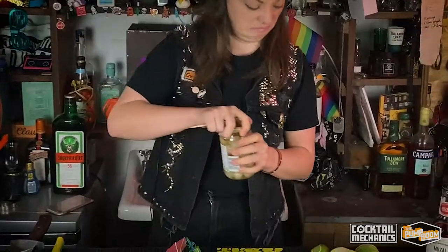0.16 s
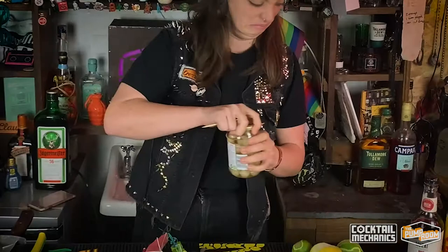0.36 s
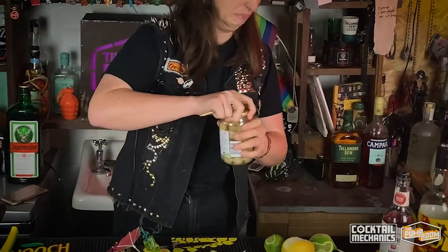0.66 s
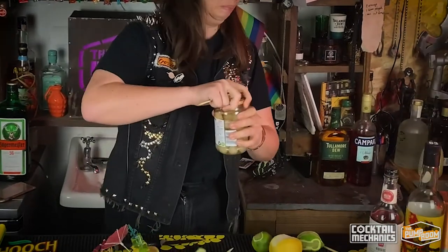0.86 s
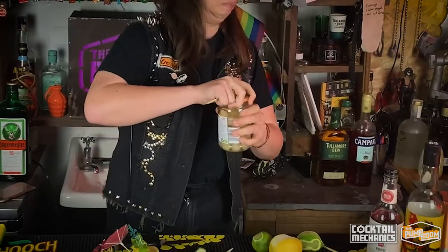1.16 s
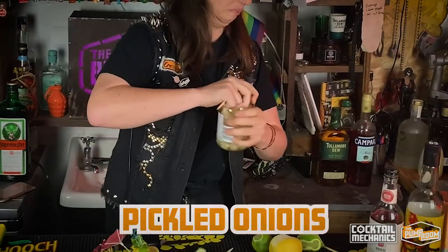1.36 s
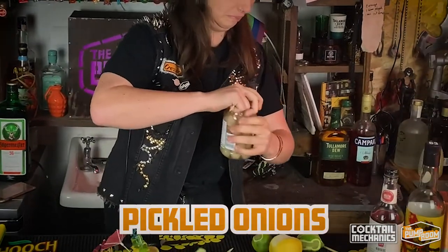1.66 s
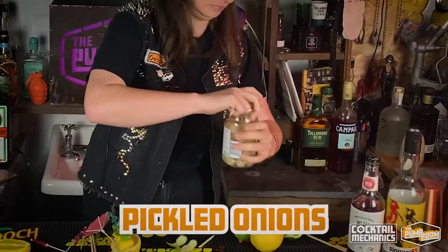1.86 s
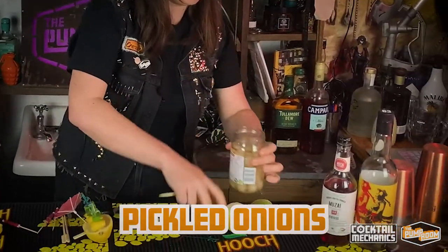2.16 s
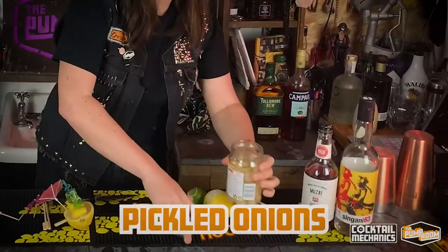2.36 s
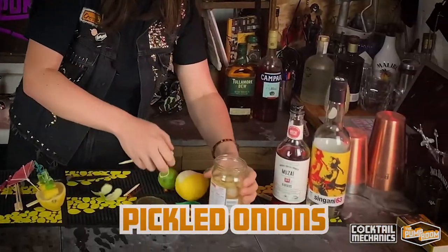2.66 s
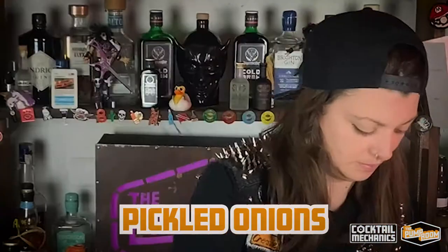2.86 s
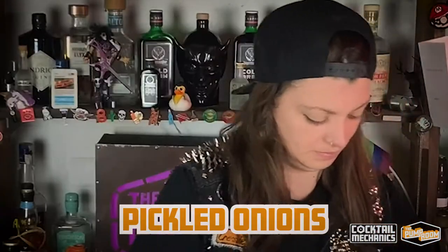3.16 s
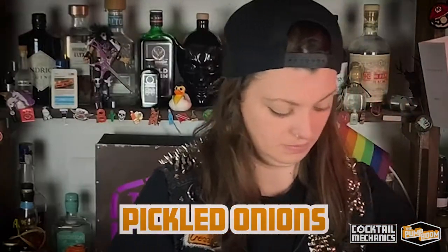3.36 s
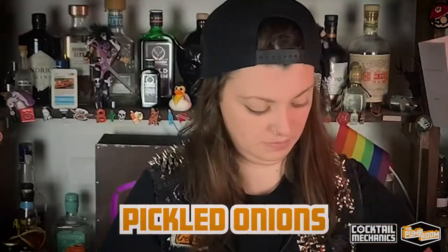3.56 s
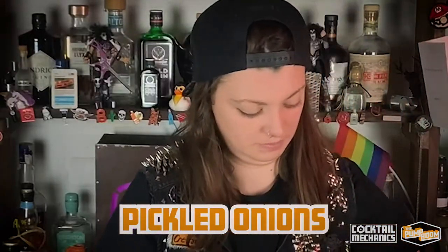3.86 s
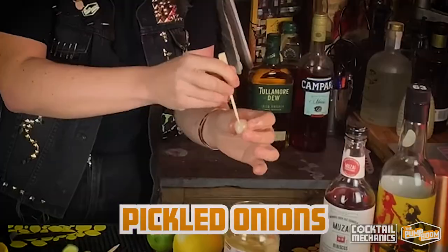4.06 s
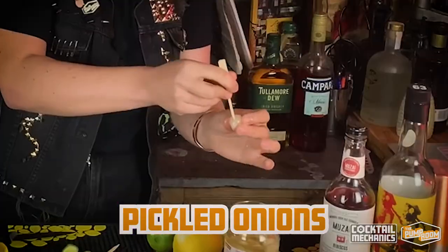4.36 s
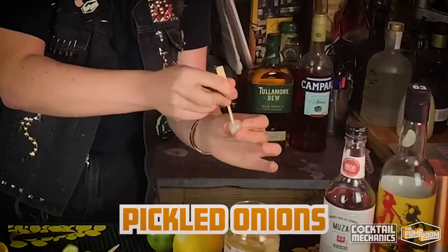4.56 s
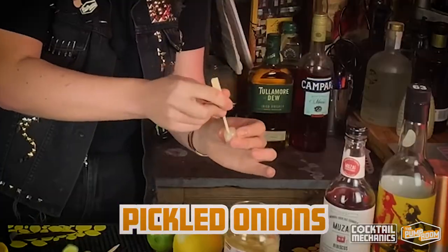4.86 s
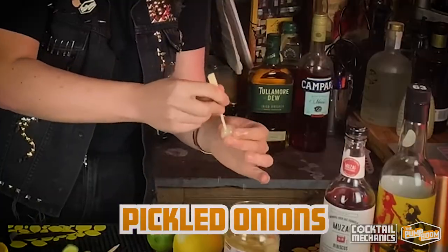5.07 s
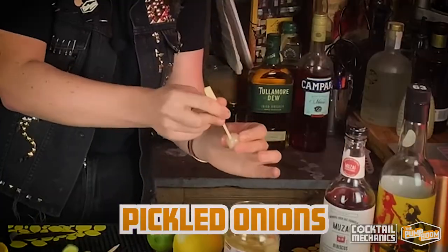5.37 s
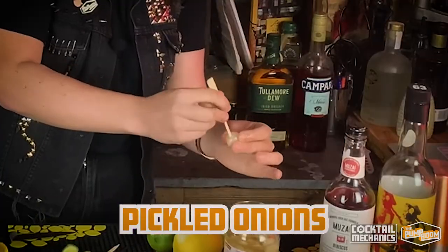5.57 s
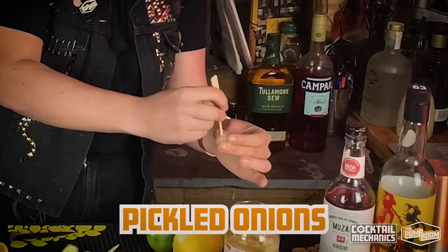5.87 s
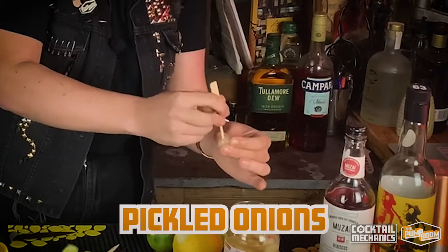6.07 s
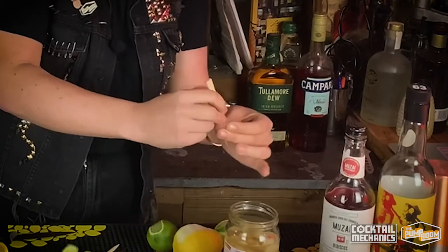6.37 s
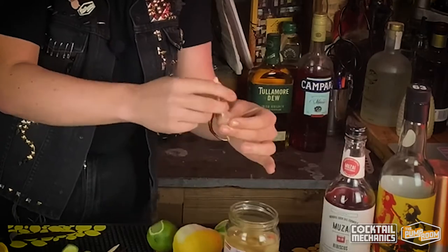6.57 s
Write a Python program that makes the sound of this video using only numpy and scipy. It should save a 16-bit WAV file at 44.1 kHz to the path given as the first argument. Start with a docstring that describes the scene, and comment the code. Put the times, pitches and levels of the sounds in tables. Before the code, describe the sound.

Quiet room rumble, a hollow jar-lid pop, a ringing metal clatter, a jar thudding onto a counter, then small crisp wet onion clicks.

```python
"""The lid of a jar of pickled onions pops its seal, ticks off the glass thread and drops with a ringing clink.
The pop is torn noise and notes of trapped air; the clink is a set of ringing modes fed by each blow.
The jar thuds and scuffs on the counter of a quiet bar, made from low modes and grainy noise.
A wet onion then clicks, squeaks and crunches onto a cocktail stick: short rings, stick-slip tones, grains.
Behind it lie rumbling air, a faint hum, a passing whine, soft pushes of air and light taps."""
import sys
import numpy as np
from scipy import signal
from scipy.fft import rfft, irfft, next_fast_len
from scipy.io import wavfile
from scipy.ndimage import uniform_filter1d

SR = 44100
rng = np.random.default_rng(int(sys.argv[2]) if len(sys.argv) > 2 else 0)


def wav_out(sig):
    """Save sig, one row per channel (or a flat mono array), as 16-bit PCM at SR to the path in sys.argv[1]."""
    wavfile.write(sys.argv[1], SR, np.round(np.clip(np.atleast_2d(sig).T, -1, 1) * 32767).astype(np.int16))


N = 295911
TIME = np.arange(N) / SR  # seconds

# centres of the lid's low, middle and high modes: (pitch_hz)
ZONES_HZ = [1000, 2500, 10040]


def amp(db):
    """Turns decibels into a plain multiplier."""
    return 10 ** (np.asarray(db) / 20)


def evened(x):
    """Scales a sound to an rms (average strength) of one."""
    return x / np.sqrt(np.mean(x ** 2) + 1e-20)


def read_spectrum(points, hz):
    """Reads (pitch_hz, level_db) points at any pitch, joining them on a log-frequency axis."""
    point_hz, point_db = np.transpose(points)
    return np.interp(np.log(hz + 1), np.log(point_hz + 1), point_db)


def add(mix, start_s, sound):
    """Mixes a sound in at its start time, cut off at the end of the scene."""
    part = mix[round(start_s * SR):][:len(sound)]
    part += sound[:len(part)]


def colour(x, spectrum):
    """Filters a sound by a (pitch_hz, level_db) spectrum."""
    hz = np.fft.rfftfreq(len(x), 1 / SR)
    return irfft(rfft(x) * amp(read_spectrum(spectrum, hz)), len(x))


def noise(spectrum, size=N):
    """Makes coloured noise with an rms of about one."""
    hiss = rng.standard_normal(next_fast_len(size))
    return evened(colour(hiss, spectrum))[:size]


def patches(depth_db, count):
    """Makes a random spectrum of bumps and dips: (pitch_hz, level_db)."""
    heights_db = depth_db * np.clip(rng.standard_normal(count), -2, 2)
    return np.transpose([np.linspace(0, SR / 2, count), heights_db])


def wander(size, smooth_samples):
    """Makes a smoothed random drift with an rms of one."""
    return evened(uniform_filter1d(rng.standard_normal(size), smooth_samples))


def envelope(events, rise_s, t60):
    """Gain of (start_s, length_s, level_db) events: rise 60 dB in rise_s, hold, fall 60 dB in t60 seconds."""
    power = np.zeros(N)
    for start_s, length_s, level_db in events:
        before = np.maximum(start_s - TIME, 0) / rise_s
        after = np.maximum(TIME - start_s - length_s, 0) / t60
        down_db = 60 * (before + after)
        near = down_db < 100
        power[near] += amp(level_db - down_db[near]) ** 2
    return np.sqrt(power)


def bursts(events, rise_s, t60):
    """Gain of (start_s, level_db) events that die as soon as they peak."""
    return envelope([(start_s, 0, level_db) for start_s, level_db in events], rise_s, t60)


def rub(gain, spectrum, grains_per_s, spread_db):
    """Friction as a stream of tiny random bursts under an envelope; spread_db makes their sizes uneven."""
    size = next_fast_len(N)
    present = rng.random(size) < grains_per_s / SR
    signs = rng.choice([-1, 1], size)
    sizes = amp(spread_db * np.minimum(rng.exponential(1, size), 4))
    return evened(colour(present * signs * sizes, spectrum))[:N] * gain


def notes(rows, glide):
    """Damped resonances that swell and die; glide is the share their pitch rises by as they fade."""
    out, t = np.zeros(N), np.arange(SR) / SR
    for start_s, pitch_hz, level_db, rise_s, t60 in rows:
        drift = 1 + glide * (1 - np.exp(-t / t60 * np.log(1000)))
        turns = np.cumsum(pitch_hz * drift) / SR
        swell = 1 - np.exp(-t / rise_s)
        add(out, start_s, amp(level_db - 60 * t / t60) * swell * np.sin(2 * np.pi * turns))
    return out


def clicks(rows, spectrum, sharpness, patchy_db):
    """Each click is a short ring around one pitch plus a broad snap with its own random colour."""
    out, t = np.zeros(N), np.arange(4096) / SR
    hz = np.fft.rfftfreq(len(t), 1 / SR) + 1
    for start_s, level_db, ring_hz, t60, snap_db in rows:
        resonance = 1 / (1 + 1j * sharpness * (hz / ring_hz - ring_hz / hz)) ** 2
        ring = irfft(rfft(rng.standard_normal(len(t))) * resonance)
        snap = colour(noise(spectrum, size=len(t)), patches(patchy_db, count=40))
        fade = amp(-60 * t / t60)
        click = evened(ring * fade) + amp(snap_db) * evened(snap * fade)
        # a quick fade holds less energy than a slow one
        add(out, start_s, amp(level_db) * click * np.sqrt(np.mean(fade ** 2)))
    return out


def room(x):
    """A small cluttered room adds a short, slightly dull tail of fading noise."""
    wet_db, t60 = -17, 0.26  # t60 in seconds
    t = np.arange(SR // 2) / SR
    tail = noise([(20, -19), (200, 4.5), (4000, -5), (15000, -5.5)], size=len(t))
    tail = tail * amp(-60 * t / t60) * (t > .004)
    return x + amp(wet_db) * signal.fftconvolve(x, tail / np.linalg.norm(tail))[:N]


def room_tone():
    """Rumbling air as coloured noise, with a faint hum of sines whose pitches waver."""
    # colour of the air: (pitch_hz, relative_db per Hz)
    air_colour = [(5, 46.5), (12, 41.5), (25, 20.5), (38, 12.5), (52, 18), (90, 1.5), (180, 5), (300, -4.5),
                  (600, -11.5), (1200, -13), (2000, -22), (4000, -30.5), (11500, -34), (12500, -42),
                  (16000, -46)]
    # machine hum, before the trim below: (pitch_hz, relative_db)
    hum_tones = [(183.0, -74.5), (484.5, -85), (1055, -89), (1217, -89), (1335, -89.5), (1427, -96)]
    # the room tone steps down a little: (time_s, gain_db)
    steps = [(4.07, 1), (4.11, -0.5)]
    air_db, hum_trim_db, waver_hz = -41, -2, 3  # before the steps
    hum = np.zeros(N)
    for pitch_hz, relative_db in hum_tones:
        turns = np.cumsum(pitch_hz + waver_hz * wander(N, 4000)) / SR
        hum += amp(relative_db + hum_trim_db) * np.sqrt(2) * np.sin(2 * np.pi * turns)
    return (amp(air_db) * noise(air_colour) + hum) * amp(np.interp(TIME, *np.transpose(steps)))


def whine():
    """A thin whine, one sine of unsteady pitch, comes and goes."""
    # when it is heard: (start_s, length_s, level_db)
    spells = [(3.33, 0.77, -84.5)]
    pitch_hz, waver_hz = 1075, 14
    turns = np.cumsum(pitch_hz + waver_hz * wander(N, 1500)) / SR
    return np.sqrt(2) * np.sin(2 * np.pi * turns) * envelope(spells, rise_s=0.16, t60=.2)


def air_pushes():
    """Hands push the air softly, heard as very low notes that swell and die."""
    # level is before the swell: (start_s, pitch_hz, level_db, rise_s, t60_s)
    pushes = [(1.328, 65, -22.5, 0.0035, 0.13), (1.36, 6.9, -9.5, 0.022, 0.55),
              (6.235, 16.4, -25, 0.013, 0.33)]
    return notes(pushes, glide=0)


def handling():
    """Light taps of fingers, jar and stick are short rings with a snap."""
    # light dry taps: (start_s, level_db, ring_hz)
    tap_rows = [(.072, -67, 6660), (2.6016, -46.5, 1540), (2.618, -61, 5500), (2.8059, -67.5, 4060),
                (3.226, -63.5, 1200), (4.594, -70, 4000), (5.1983, -69, 3740), (5.341, -71.5, 2940),
                (6.6911, -68, 4170)]
    t60, snap_db = 0.019, -9.5  # seconds; dB against the ring
    taps = [(start_s, level_db, ring_hz, t60, snap_db) for start_s, level_db, ring_hz in tap_rows]
    return clicks(taps, [(300, 0), (2500, 0), (9000, -7), (15500, -3)], sharpness=2.8, patchy_db=5.5)


def squeak():
    """The stick grips and slips thousands of times a second; the overtones carry the gliding squeak."""
    # wood slipping in the onion's skin, level before the swell:
    # (start_s, length_s, level_db, slip_rate_hz, glide_share, unevenness_share)
    squeaks = [(4.263, 0.007, -51, 3440, .2, 0.038), (4.275, 0.015, -55, 3050, -0.026, .007),
               (4.304, 0.0063, -60, 2800, -0.05, .055), (4.322, 0.02, -64.5, 2960, -0.13, .07)]
    harmonics_db = (-3, 12.5, 12.5, 10, 3)  # from the slip rate upward, against each other
    out = np.zeros(N)
    for start_s, length_s, level_db, slip_hz, glide, uneven in squeaks:
        along = np.linspace(0, 1, round(length_s * SR))
        wobble = wander(SR, 24)[:len(along)]
        turns = np.cumsum(slip_hz * (1 + glide * along + uneven * wobble)) / SR
        tone = np.zeros(len(along))
        for number, db in enumerate(harmonics_db, start=1):
            tone += amp(db) * np.cos(2 * np.pi * number * turns)
        add(out, start_s, amp(level_db) * evened(tone) * np.sin(np.pi * along))
    return out


def onion():
    """The stick clicks and squeaks in the wet onion, and tearing flesh crunches as a stream of grains."""
    # wet clicks of the stick: (start_s, level_db, ring_hz)
    tick_rows = [(4.092, -61, 12050), (4.1005, -47.5, 11500), (4.261, -46.5, 7800), (4.288, -48.5, 6950),
                 (4.3532, -57.5, 11100), (4.4746, -66.5, 10960), (4.522, -61.5, 9000), (4.6023, -62, 11100),
                 (4.614, -62, 8920), (4.6378, -63, 10980), (4.9261, -51, 11700), (5.636, -66, 11900),
                 (6.2033, -44.5, 10080), (6.2084, -46, 9100), (6.2457, -53, 7980), (6.509, -67.5, 7120),
                 (6.529, -58.5, 10520)]
    # the stick tearing through the flesh: (start_s, length_s, level_db)
    crunches = [(3.96, 0.15, -87.5), (4.12, 0.014, -68), (4.231, .017, -71.5), (4.305, 0.074, -69.5),
                (4.48, 0.061, -86), (5.6, .18, -83), (6.203, 0.036, -62), (6.695, 0.014, -75.5)]
    # colour of the flesh: (pitch_hz, relative_db)
    flesh = [(100, -45), (500, -35), (2000, -10.5), (4000, -7), (8000, 0.5), (12000, 4), (15500, -4)]
    t60, snap_db = 0.008, -9.5  # seconds; dB against the ring
    rows = [(start_s, level_db, ring_hz, t60, snap_db) for start_s, level_db, ring_hz in tick_rows]
    ticks = clicks(rows, flesh, sharpness=2.1, patchy_db=6)
    crunch_gain = envelope(crunches, rise_s=0.03, t60=0.064)
    return ticks + squeak() + rub(crunch_gain, flesh, grains_per_s=3300, spread_db=4.5)


def jar():
    """Each edge of the jar's base sets the counter's low modes ringing, and the glass scuffs to rest."""
    # one edge and then the other meets the counter: (start_s, strength_db)
    set_down = [(2.622, 0.5), (2.669, -8.5)]
    # modes of the counter, before the strength of each edge: (pitch_hz, relative_db, t60_s)
    counter = [(26.24, -29, 0.65), (54, -39, 0.43), (115, -25, 0.064), (177.8, -33, 0.14),
               (294.4, -31, 0.27)]
    # the base scuffing and then settling: (start_s, length_s, level_db)
    scuffs = [(2.622, .003, -44), (2.633, 0.023, -39), (2.76, 0.073, -69)]
    # colour of the scuffing: (pitch_hz, relative_db)
    slide_colour = [(100, 10), (350, 1.5), (700, -4), (1200, -6.5), (1600, -7), (2100, -6.5), (3000, -20),
                    (5000, -34.5), (9000, -44), (15000, -51.5)]
    rise_s = 0.0038
    rows = []
    for start_s, strength_db in set_down:
        for pitch_hz, relative_db, t60 in counter:
            rows.append((start_s, pitch_hz, strength_db + relative_db, rise_s, t60))
    thuds = notes(rows, glide=0)
    scuff_gain = envelope(scuffs, rise_s=0.018, t60=0.16)
    return thuds + rub(scuff_gain, slide_colour, grains_per_s=940, spread_db=-0.5)


def seal():
    """The seal rips and air rushes in past it, both as a stream of uneven grains."""
    # the seal giving way in quick rips: (start_s, level_db)
    rips = [(1.3305, -30.5), (1.3345, -22), (1.358, -24.5)]
    # air rushing in: (start_s, length_s, level_db)
    inrush = [(1.33, 0.045, -39)]
    # colour of both: (pitch_hz, relative_db)
    seal_colour = [(59, -37.5), (100, 1.5), (253, -20.5), (411, -14), (530, -28), (861, -16), (1370, -30.5),
                   (1920, -21.5), (2930, -22.5), (7730, -26), (8580, -26.5), (10200, -25), (15500, -46.5)]
    rip_gain = bursts(rips, rise_s=0.0094, t60=.034)
    inrush_gain = envelope(inrush, rise_s=0.014, t60=.085)
    return rub(np.hypot(rip_gain, inrush_gain), seal_colour, grains_per_s=7000, spread_db=2.5)


def air_under_lid():
    """Air under the lid pops in hollow, slightly rising notes, then gulps through the gap as the lid turns."""
    # hollow notes, level before the swell: (start_s, pitch_hz, level_db)
    pop_rows = [(1.3555, 270, -23), (1.3565, 824, -22), (1.357, 1790, -29), (1.362, 432, -20.5),
                (1.370, 517, -18), (1.374, 628, -24.5), (1.779, 667, -32.5), (1.8, 790, -33.5),
                (1.8005, 1750, -48), (1.812, 888, -44)]
    # gulps of air: (start_s, level_db)
    gulps = [(1.388, -41.5), (1.466, -45), (1.509, -50), (1.553, -64), (1.595, -62), (1.786, -55.5)]
    # colour of the gap: (pitch_hz, relative_db)
    gap_colour = [(250, -53.5), (420, -12.5), (520, 0), (620, -2.5), (750, -14.5), (1500, -44), (6000, -77)]
    rise_s, t60 = .0013, .038  # seconds
    rows = [(start_s, pitch_hz, level_db, rise_s, t60) for start_s, pitch_hz, level_db in pop_rows]
    gulp_gain = bursts(gulps, rise_s=.06, t60=0.089)
    return notes(rows, glide=.04) + rub(gulp_gain, gap_colour, grains_per_s=2200, spread_db=0.0)


def thread():
    """The lid catches on the glass thread in short ringing ticks."""
    # each catch, snap measured against the ring: (start_s, level_db, ring_hz, snap_db)
    catches = [(1.4392, -45, 9800, -23), (1.459, -49, 2420, 3), (1.4662, -40.5, 2430, 4),
               (1.505, -53, 2520, -8), (1.516, -43, 11300, -11), (1.542, -53.5, 4300, -4),
               (1.555, -34.5, 3740, -3.5), (1.572, -44, 10400, -8), (1.5964, -44, 2820, -1.5),
               (1.6218, -64, 6000, 4), (1.63, -52, 12500, -5), (1.7999, -56.5, 3150, -1.5),
               (1.895, -59, 2760, 0.5), (1.942, -53, 13100, -20)]
    t60 = 0.033  # seconds
    rows = [(start_s, level_db, ring_hz, t60, snap_db) for start_s, level_db, ring_hz, snap_db in catches]
    snap_colour = [(300, -7.0), (1300, -14), (2200, -8.5), (9000, -1), (15500, -10.5)]
    return clicks(rows, snap_colour, sharpness=5, patchy_db=8.5)


def contact(strength_db, centre_hz):
    """A blow weakens in the zones away from its centre pitch; returns (pitch_hz, level_db)."""
    below_db_per_octave, above_db_per_octave = 10.5, 6
    octaves = np.log2(np.array(ZONES_HZ) / centre_hz)
    weakening_db = np.minimum(below_db_per_octave * octaves, -above_db_per_octave * octaves)
    return np.transpose([ZONES_HZ, strength_db + weakening_db])


def lid():
    """Every blow of the dropped, rocking lid cracks, clatters and feeds the same modes, until its ring is damped."""
    # strikes, before the final damping; a harder contact has a higher centre: (start_s, strength_db, centre_hz)
    clinks = [(2.336, -20.5, 1000), (2.3368, -30.5, 8930), (2.3455, -20.5, 7000), (2.3486, -16.5, 5500),
              (2.3587, -21.5, 2700), (2.3665, -24.5, 1100), (2.376, -29, 5500), (2.407, -38.5, 2180),
              (2.442, -33.5, 4060), (2.454, -29.5, 990), (2.4599, -27, 3200), (2.4873, -20.5, 4500),
              (2.491, -23.5, 12000), (2.511, -30, 12000)]
    # modes of the lid, before the blow's strength and the final damping: (pitch_hz, relative_db, t60_s)
    lid_modes = [(296, -27, .3), (864, -10, .17), (894, -2, .28), (1277, -12, .45), (1318, -20, .22),
                 (2125, -14, .1), (2507, -17, .25), (2555, -18, .32), (2997, -15, .27), (3047, -15, .2),
                 (3226, -17, .15), (3275, -8, .19), (3321, -12, .14), (3582, -17, .36), (3826, -13, .25),
                 (3885, -13, .14), (4161, -22, .2), (4565, -23, .17), (4990, -21, .15), (6358, -26, .16),
                 (7273, -22, .12), (7940, -11, .07), (10161, -12, .13), (11800, -24, .13),
                 (12700, -23, .14), (13518, -24, .13), (14330, -19, .09), (14560, -22, .11)]
    # crowd of short-lived modes: (pitch_hz, relative_db)
    clatter_colour = [(100, -20), (350, 1), (800, 3), (1100, -5), (1500, -7), (2100, 2.5), (2800, 1.5),
                      (3600, 1.5), (4500, -3.5), (9000, -8.5), (11000, 4), (15500, -4)]
    # brief crack of each contact: (pitch_hz, relative_db)
    crack_colour = [(100, -17), (500, -9), (1500, -7.5), (2100, 13.5), (2800, -2.5), (5000, -9.5),
                    (9000, -8.5), (15500, -11)]
    clatter_db, clatter_t60 = -7, 0.13  # against the blow; seconds, before the final damping
    crack_db, crack_t60 = 3, 0.019
    rest_s, damping_db_per_s = 2.4673, 210  # when damping sets in, with the last clinks still to come
    rocking_share, flat_share = 0.91, 1  # share of the deepest ring that outlasts a contact

    out, t = np.zeros(N), np.arange(SR * 3 // 4) / SR
    hz, mode_db, t60 = np.transpose(lid_modes)
    pole = 2j * np.pi * hz - np.log(1000) / t60  # turning and fading of each mode
    modes = np.exp(pole[:, None] * t)
    crowd = patches(5, count=220)  # weak modes bunch together, the same way for every blow
    swing = 1e-9 * np.exp(2j * np.pi * rng.random(len(hz)))  # almost still, at random phases
    last_s = clinks[0][0]
    for start_s, strength_db, centre_hz in clinks:
        blow = contact(strength_db, centre_hz)
        share = rocking_share if start_s < rest_s else flat_share
        gap_s = (round(start_s * SR) - round(last_s * SR)) / SR
        swing = swing * np.exp(pole * gap_s)
        # an early contact stops a little of the deep ring, a late one none
        kept = swing * np.where(hz < ZONES_HZ[0], share, 1)
        # it then pushes each mode a quarter turn ahead of or behind its swing
        push = rng.choice([-1, 1], len(hz)) * amp(mode_db + read_spectrum(blow, hz))
        struck = kept + 1j * push * swing / abs(swing)
        # only the change is added, as the earlier ring is already in the mix
        add(out, start_s, ((struck - swing)[:, None] * modes).imag.sum(0))
        swing, last_s = struck, start_s
        clatter = evened(colour(noise(clatter_colour, size=len(t)), crowd))
        add(out, start_s, colour(clatter, blow) * amp(clatter_db - 60 * t / clatter_t60))
        # each spot on the rim cracks differently
        crack = evened(colour(noise(crack_colour, size=len(t)), patches(4, count=30)))
        add(out, start_s, colour(crack, blow) * amp(crack_db - 60 * t / crack_t60))
    return out * amp(-damping_db_per_s * np.maximum(TIME - rest_s, 0))


def scene():
    """The jar is opened, the lid dropped, the jar set down and the onion skewered, over the room tone."""
    background = room_tone() + whine() + air_pushes()
    opening = seal() + air_under_lid() + thread()
    return (background + room(handling() + onion() + jar() + opening + lid()))[None]


def record(dry):
    """A low-pass filter removes the treble above about 16 kHz."""
    edge_hz = 15950
    low_pass = signal.firwin(255, edge_hz, window=("kaiser", 9), fs=SR)
    return signal.oaconvolve(dry, low_pass[None], "same")


dry = scene()
out = record(dry)
wav_out(out)
```